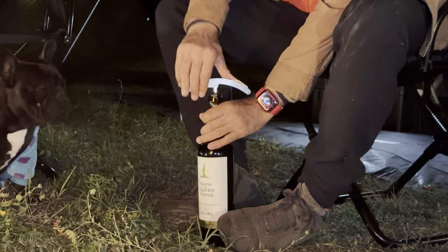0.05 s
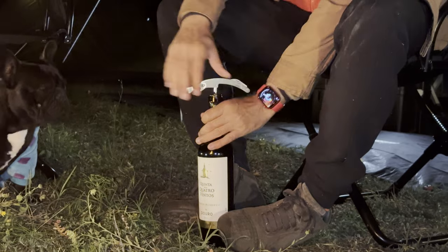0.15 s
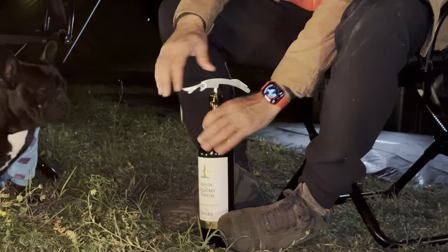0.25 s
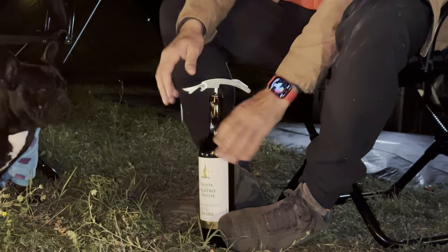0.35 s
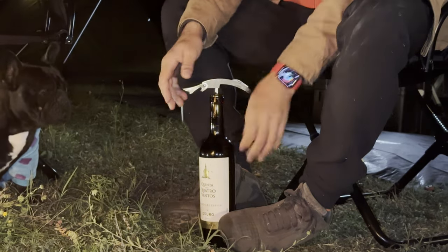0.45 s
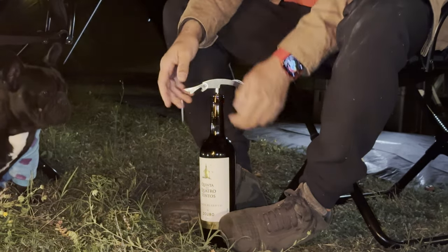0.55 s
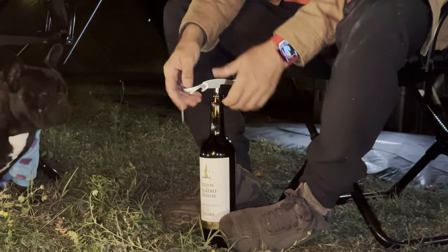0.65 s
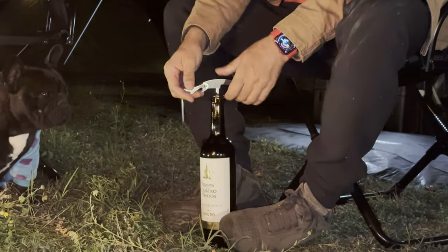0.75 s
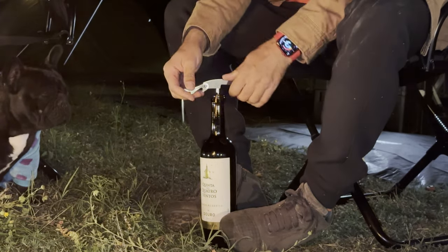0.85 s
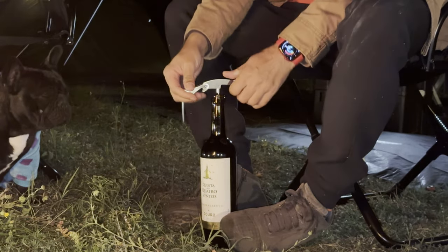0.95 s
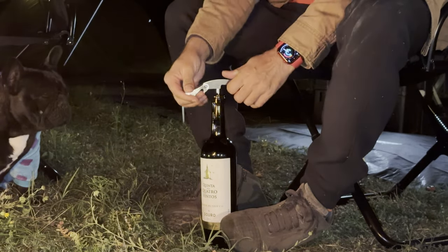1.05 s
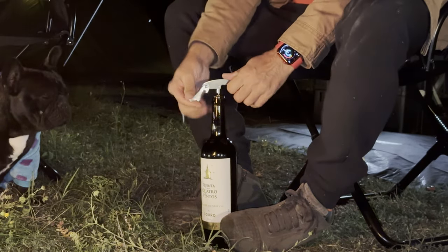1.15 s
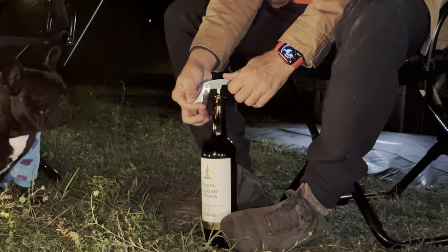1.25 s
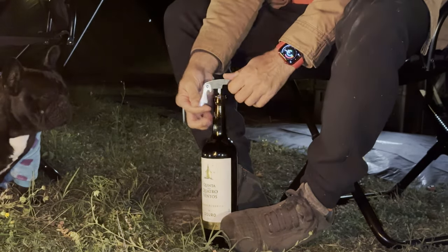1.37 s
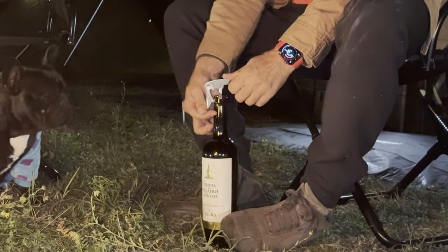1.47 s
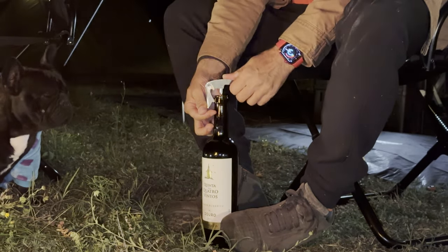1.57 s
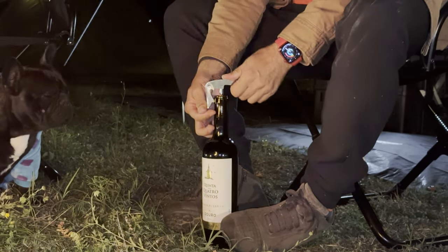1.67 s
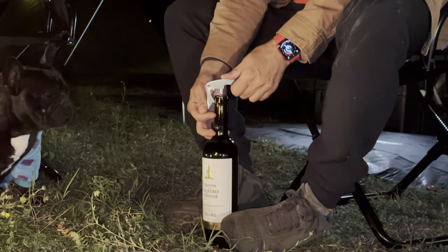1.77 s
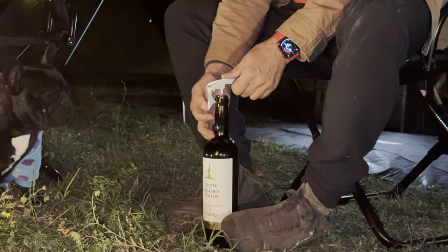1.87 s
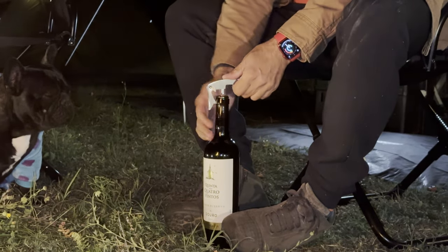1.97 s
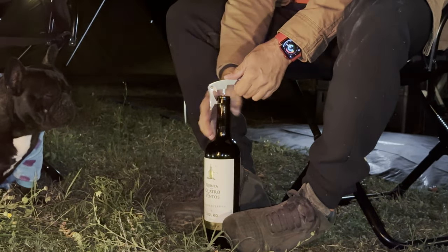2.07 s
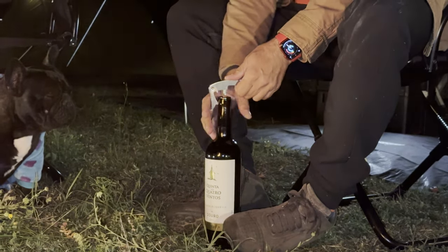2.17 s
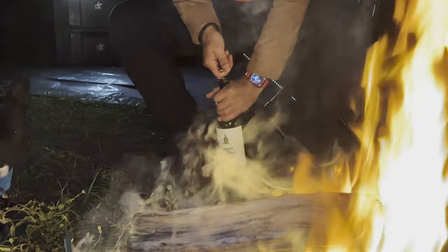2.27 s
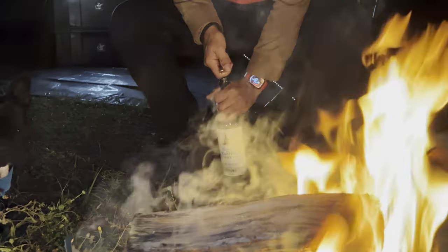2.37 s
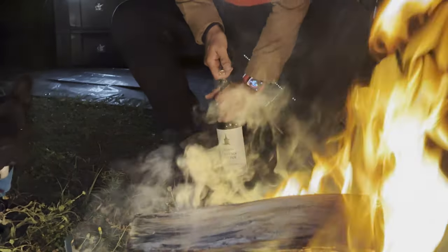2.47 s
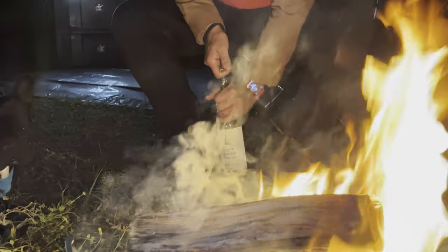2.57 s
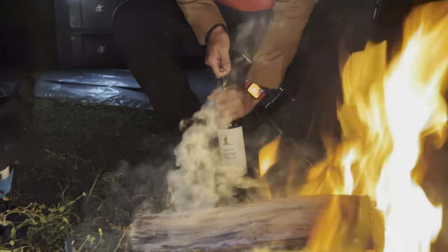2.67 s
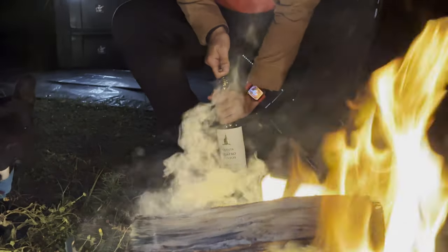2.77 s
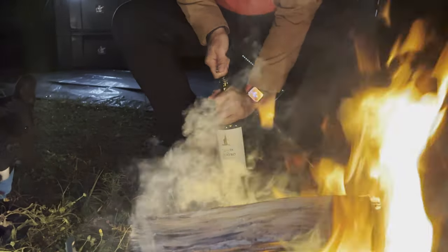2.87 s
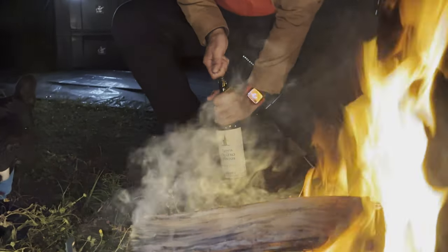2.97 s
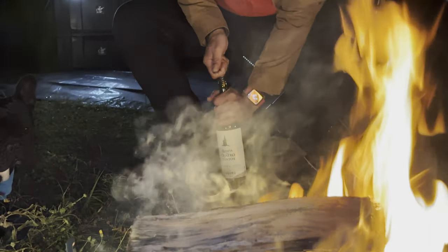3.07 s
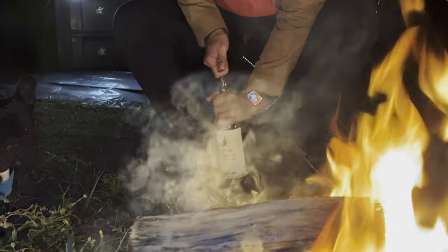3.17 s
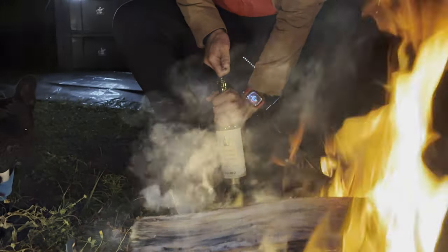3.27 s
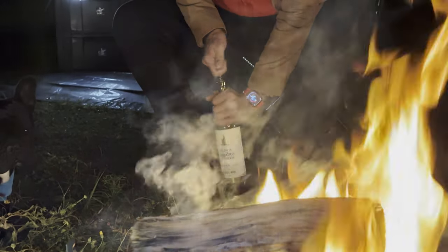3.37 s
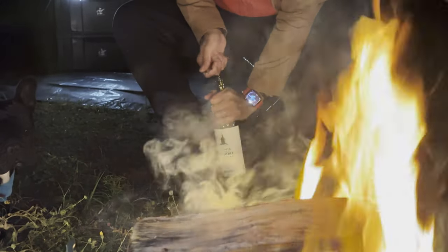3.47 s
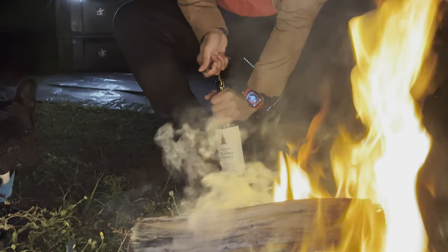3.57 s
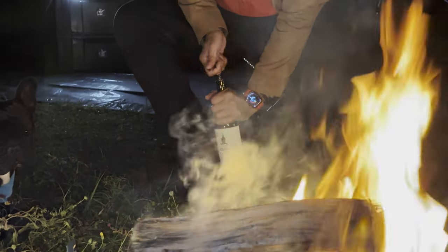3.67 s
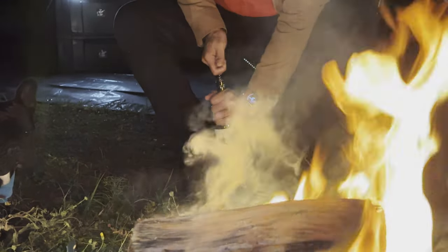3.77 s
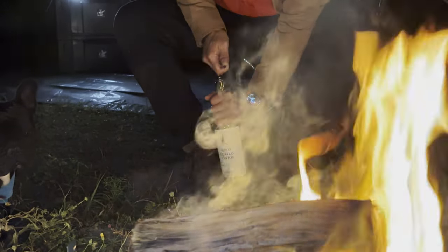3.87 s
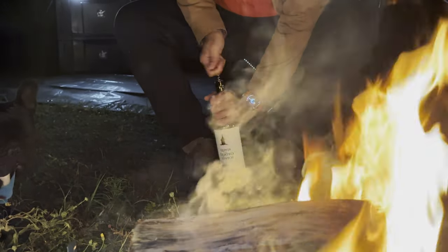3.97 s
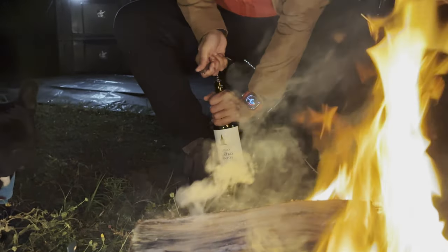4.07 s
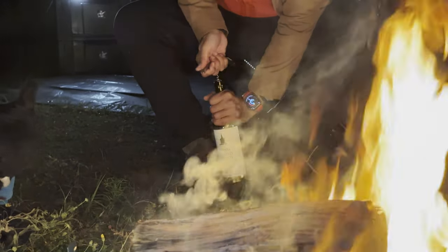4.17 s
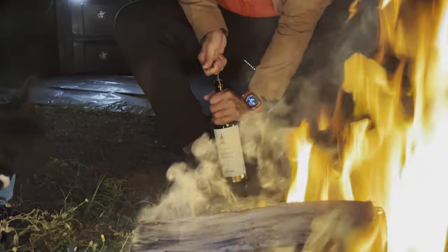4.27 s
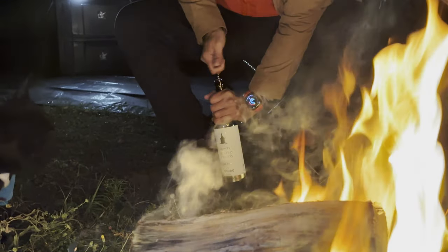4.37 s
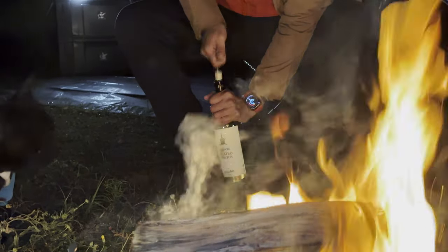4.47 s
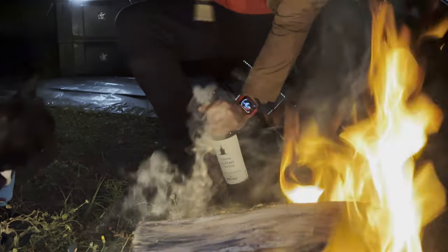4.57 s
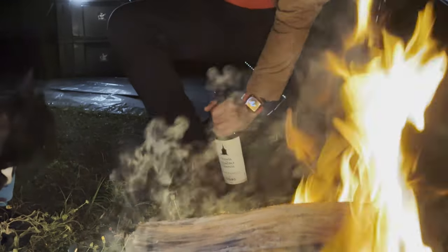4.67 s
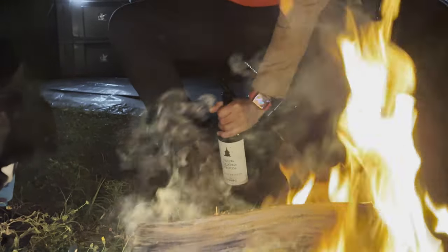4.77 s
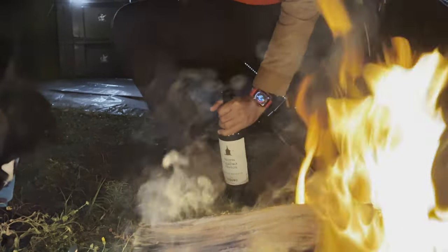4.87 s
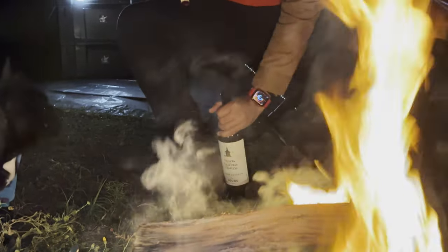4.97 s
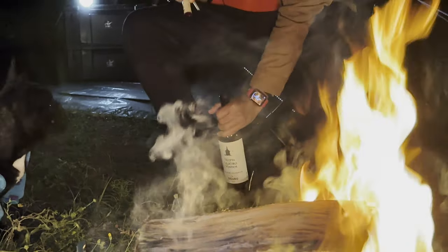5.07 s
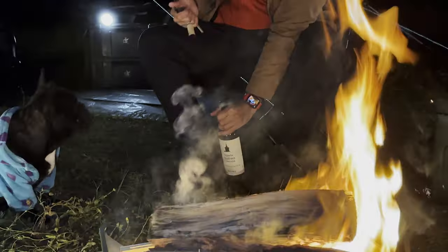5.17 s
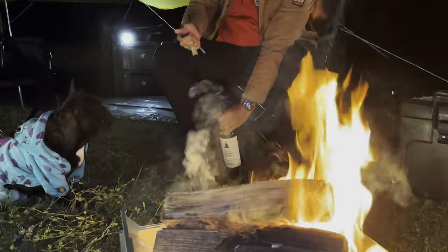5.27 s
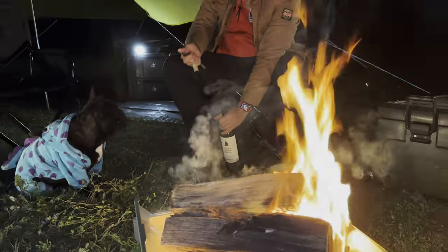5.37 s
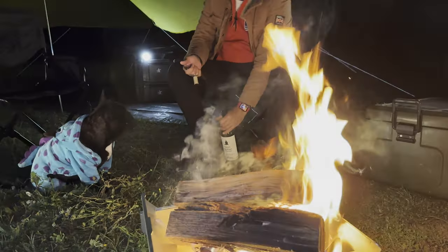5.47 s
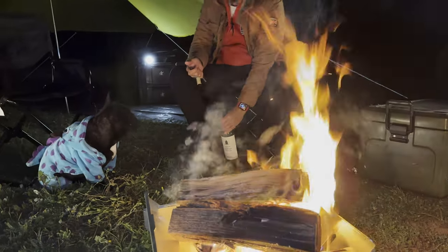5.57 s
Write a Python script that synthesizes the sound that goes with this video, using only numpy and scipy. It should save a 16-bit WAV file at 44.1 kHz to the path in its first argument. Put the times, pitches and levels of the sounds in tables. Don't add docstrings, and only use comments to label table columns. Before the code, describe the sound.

Night air and a campfire make a low, fluttering rumble throughout, with dry wood snaps, mostly leaning slightly left. From 0 to 2.2 s, fingers and a corkscrew lever give dull taps and small knocks on a bottle, denser around 1.1 s, with a bright steel clink at 1.45 s. At about 2.3 s the microphone jumps nearer the fire: deeper rumble, faint spits, ember ticks and gusts of hiss. A strong snap comes at 2.8 s. The screw chafes narrowly in the cork from 2.9 to 4.1 s; at 3.3 s a very loud snap precedes a squeak that climbs, drops and rises again until 3.5 s. Another strong snap hits at 4.38 s among short, rough cork tugs between 4.1 and 4.45 s, with the glass singing. At 4.51 s comes the loud, hollow pop with thump and puff, then a wavering whistle until 4.65 s. Ticks, soft taps and fire continue to about 5.6 s.

```python
import sys
import numpy as np
from scipy import signal
from scipy.fft import irfft
from scipy.io import wavfile
from scipy.ndimage import uniform_filter1d

SR = 44100
rng = np.random.default_rng(int(sys.argv[2]) if len(sys.argv) > 2 else 0)


def gain_from_decibels(decibels):
    exponent = np.asarray(decibels, float) / 20
    return 10 ** exponent


def to_wav(s):
    ch = np.atleast_2d(s).T
    pcm = np.round(np.clip(ch, -1, 1) * 32767)
    wavfile.write(sys.argv[1], SR, pcm.astype(np.int16))


N = 248106
CHANGE_S = 2.26


def evened(x):
    return x / np.sqrt(np.mean(x ** 2) + 1e-20)


def read(points, hz, column=1):
    table = np.transpose(points)
    return np.interp(np.log(hz + 1), np.log(table[0] + 1), table[column])


def add(mix, s, sound, pan_db=0.):
    part = mix[:, round(s * SR):][:, :len(sound)]
    part += gain_from_decibels(np.array([[pan_db / 2], [-pan_db / 2]])) * sound[:part.shape[1]]


def resonate(x, hz, width):
    turn = np.exp(2j * np.pi * np.cumsum(hz * np.ones(len(x))) / SR)
    r = np.exp(-np.pi * width / SR)
    return 2 * (turn * signal.lfilter([1 - r], [1, -r], x / turn + 1e-18)).real


def band(x, lo_hz, hi_hz):
    return signal.sosfilt(signal.butter(2, [lo_hz, hi_hz], "bandpass", fs=SR, output="sos"), x)


def band_twice(x, outer, inner):
    return band(band(x, *outer), *inner)


def ring(modes, t):
    return sum(gain_from_decibels(db - 60 * t / t60) * np.sin(2 * np.pi * hz * t) for hz, db, t60 in modes)


def burst(t60, rise_s, tail_db, tail_t60=0.091):
    t = np.arange(8000) / SR
    fall = gain_from_decibels(-60 * t / t60) + gain_from_decibels(tail_db - 60 * t / tail_t60)
    return rng.standard_normal(len(t)) * (1 - np.exp(-t / rise_s)) * fall


def unroll(rows):
    s, *columns = np.transpose(rows)
    t = np.arange(s[0], s[-1], 1 / SR)
    return s[0], [np.interp(t, s, c) for c in columns]


def swells(rows, t, depth_db):
    s, db, rise_s, fall_s = np.transpose(rows)[:, :, None]
    return (db - depth_db * np.maximum((s - t) / rise_s, (t - s) / fall_s)).max(axis=0)


# frequency in Hz, level in dB per Hz before the background changes, the same
AIR_TONE = [(15, -70, -45), (26.6, -18.5, -13), (51, 7, 6.5), (111, -3, -4), (251, -17, -19),
            (446, -28, -23), (900, -28, -21.5), (2056, -33.5, -32), (3160, -42.5, -45.5), (6000, -39, -56),
            (9000, -40, -60), (15560, -52, -42.5), (16100, -76.5, -69.5)]
# frequency in Hz, left-right likeness 0-1.
AIR_LIKENESS = [(60, 0.99), (130, 1), (290, 0.884), (640, 0.54), (1410, 0.056), (2500, 0.68), (4000, 0.89),
                (7000, 1), (15000, 0.57)]
# frequency in Hz, level in dB.
HISS_TONE = [(1500, -11.5), (3000, 4), (6000, -2), (9000, -0.5), (15700, -3), (16100, -26)]
# time in seconds, low roar in dB.
FLARES = [(0.0, -62.5), (0.17, -58), (0.45, -61), (1.24, -59.5), (1.41, -65), (2.1, -67), (2.8, -62.5),
          (3.2, -65), (3.9, -62.5), (4.14, -58.5), (4.48, -57.5), (5.11, -67), (5.63, -64)]
# frequency in Hz, share of the flare felt 0-1.
FLARE_SHARE = [(60, 0.095), (130, 0.51), (400, 0.886), (900, 0.44), (2500, 1), (5000, 0.62), (9000, 0.12)]
# peak in seconds, peak in dB, rise in seconds, fall in seconds.
GUSTS = [
    (3.19, -75.5, 0.32, 0.216),
    (3.39, -74, .07, 0.12),
    (3.73, -76, 0.17, 0.82),
    (4.37, -67, 0.51, 0.55),
    (4.56, -66.5, 0.5, 0.28),
    (5.63, -79.5, 0.61, .1),
]
AIR_DB, HISS_DB, GUST_DEPTH_DB, PATCHY_DB = -52.5, -84.5, 19, 2.1


def air():
    frames, hz = N // 256 + 5, np.fft.rfftfreq(1024, 1 / SR)
    a, b, c, d, patches = rng.standard_normal((frames, 513, 5)).T
    patches = evened(uniform_filter1d(uniform_filter1d(patches, size=14, axis=0), size=10, axis=1))
    t = np.arange(frames) * 256 / SR
    before, after = (gain_from_decibels(read(AIR_TONE, hz, column=k)) for k in (1, 2))
    level = np.where(t < CHANGE_S, before[:, None], after[:, None])
    level *= gain_from_decibels(AIR_DB) / np.sqrt(np.mean(before ** 2))
    flare_db = np.interp(t, *np.transpose(FLARES))
    level *= gain_from_decibels(np.outer(read(FLARE_SHARE, hz), flare_db - np.median(flare_db)))
    gust = gain_from_decibels(np.maximum(swells(GUSTS, t, GUST_DEPTH_DB), HISS_DB) + 5.5) * (t >= CHANGE_S)
    gust = gain_from_decibels(read(HISS_TONE, hz))[:, None] * gust
    flutter = gain_from_decibels(PATCHY_DB * patches * np.clip(hz / 400, .6, 1)[:, None])
    same = read(AIR_LIKENESS, hz)[:, None]
    left = a + 1j * b
    right = same * left + np.sqrt(1 - same ** 2) * (c + 1j * d)
    z = np.array([left, right]) * np.hypot(level, gust) * flutter
    unit = np.std(signal.istft(left, nperseg=1024, noverlap=768)[1])
    return signal.istft(z, nperseg=1024, noverlap=768)[1][:, :N] / unit


# start in seconds, peak in dB, low part in dB, top part in dB,
# left-right in dB.
SNAPS = [(0.1218, -29.5, 0.5, -31, 4.5), (1.035, -33.5, -26, -33, 0.0), (1.4531, -26, -24, -13, 4.5),
         (1.7577, -32.5, -16.5, -27, 3.5), (2.0472, -32, -20, -16, 4), (2.397, -34.5, -15, -14, 2),
         (2.787, -19.5, -24.5, -17.5, 3.5), (2.8028, -39, -15, -24, -6), (2.768, -53, -18, -19, 0),
         (3.2858, -61, -30, -4, 0), (4.4855, -49, -22, -11.5, 1), (3.3, -11, -25.5, -9.5, 2),
         (3.8015, -44, -5, -24, 8), (4.376, -21, -17, -15, 5), (5.6234, -31.5, -25.5, -22.5, -5)]
# start in
# seconds, peak in dB, top part in dB, centre in Hz.
TICKS = [(2.2837, -56, -16, 9400), (2.579, -51, -19, 8930), (2.9121, -53.5, -24, 8600),
         (2.939, -57, -23, 5870), (3.0237, -57.5, -21, 8900), (3.1307, -54, -16, 8000),
         (3.1946, -57, -16, 8930), (3.5597, -58.5, -23, 8750), (4.1826, -43, -33, 6770),
         (4.1869, -46, -34, 5400), (4.601, -44, -18, 9000), (4.6249, -55, -11.5, 9440),
         (4.6593, -40.5, -15, 8570), (4.6917, -40, -7, 5800), (4.7386, -57, -11, 5480),
         (4.75, -54, -10, 8270), (4.795, -46, -17, 9370), (4.8592, -52, -12, 6780), (4.879, -58, -15, 9400),
         (4.9528, -63, -10, 6080), (5.052, -47, -12, 8240), (5.4958, -51, -10, 8900),
         (5.5082, -53.5, -14.5, 8600), (5.542, -59, -24, 5910)]
SNAP_HZ, TICK_LOW_DB, TICK_GAIN_DB = 8133, -21, 0.1
LOUD_DB = -40
SPITS_PER_S, SPITS_DB = 25, -71


def crackle(db, low_db, top_db, centre_hz):
    loud = db > LOUD_DB
    crack = burst(.0085, rise_s=.0005, tail_db=-21 - .45 * max(db - LOUD_DB, 0), tail_t60=.1)
    crack[25] += np.clip((db + 52.5) / 1.1, 0, 6.5)
    crack = band(crack, 300, 17000 if loud else 15000)
    ranges = [(700, 6070), (3000, 10800), (11500, 17200 if loud else 15700)]
    low, middle, top = (evened(band_twice(crack, hz, hz)) for hz in ranges)
    pitch_db = -8.8 if db >= LOUD_DB else 0.5
    middle = evened(middle + gain_from_decibels(pitch_db) * evened(resonate(middle, centre_hz, 1900)))
    top_fall = gain_from_decibels(-np.arange(len(top)) / SR * 760.0)
    crack = gain_from_decibels(low_db + 10.5) * low + middle + gain_from_decibels(top_db + 12.5) * top * top_fall
    return crack / abs(crack).max()


def fire():
    out = np.zeros((2, N))
    snaps = [(*row, SNAP_HZ) for row in SNAPS]
    ticks = [(s, db + TICK_GAIN_DB, TICK_LOW_DB, top_db, 0, hz) for s, db, top_db, hz in TICKS]
    for s, db, low_db, top_db, pan_db, centre_hz in snaps + ticks:
        add(out, s, gain_from_decibels(db + 1.0) * crackle(db, low_db, top_db, centre_hz), 0.83 * pan_db)
    sizes = gain_from_decibels(2.1 * np.minimum(rng.exponential(1, N), 3))
    sizes *= (rng.random(N) < SPITS_PER_S / SR) * (np.arange(N) > CHANGE_S * SR)
    spit = band(burst(0.0059, rise_s=.0003, tail_db=-35.5), 3500, 16000)
    return out + gain_from_decibels(SPITS_DB) * signal.oaconvolve(sizes, spit)[:N]


# start in seconds,
# peak in dB, centre in Hz, broad click in dB.
TAPS = [(0.122, -28.5, 1300, -9), (0.14, -36, 1430, -2), (1.032, -45.5, 824, 13), (1.071, -33.5, 1330, -5),
        (1.084, -35, 477, -2), (1.101, -39, 2130, 10), (1.113, -38, 1300, -1), (1.205, -43.5, 687, -10),
        (1.319, -54.5, 802, 14), (1.419, -46.5, 1330, 4), (1.482, -47, 700, 16), (1.537, -50.5, 616, 9),
        (1.638, -50, 980, -8), (1.724, -47.5, 830, 8), (1.755, -48.5, 1510, -0.5), (1.764, -57, 826, 3),
        (1.936, -53.5, 711, -19), (2.046, -56, 1550, -4), (2.305, -48.5, 619, 7), (2.5, -50.5, 714, -11),
        (2.646, -63, 526, 7), (3.342, -45.5, 795, -5), (4.295, -39.5, 1410, 7), (4.684, -51.5, 805, -1),
        (4.859, -46, 2100, 5.5), (4.977, -51, 617, -26), (5.1, -52, 422, -23), (5.511, -61, 1900, -15),
        (5.6235, -35.5, 830, -9.5)]
# start
# in seconds, peak in dB, centre in Hz, broad click in dB, t60 in seconds.
THUDS = [(.185, -55, 660, -9, 0.26), (1.079, -48, 900, 2.5, 0.026), (1.092, -53, 1210, -7, .02),
         (1.129, -48.5, 1300, 5, .02), (1.165, -53, 1300, -5.5, .02), (1.207, -46.5, 340, -11, 0.049),
         (3.3007, -36.5, 2520, -24, 0.012), (3.301, -35.5, 1430, -20, 0.017),
         (0.1226, -42, 2400, -3, 0.028), (3.517, -54, 400, -19, 0.039), (3.525, -56.5, 2300, -8, 0.013),
         (4.105, -56, 2150, -8, .03), (4.684, -52.5, 3200, -16, .02)]
# start in seconds, peak in dB, level of the upper modes in dB.
CLINKS = [
    (0.059, -54.5, -17),
    (1.4540, -31, 3),
    (1.755, -59, -12),
]
# frequency in Hz, level in dB, t60 in seconds.
LEVER = [(2207, -10, .025), (4167, -11, .21), (4313, 0, .062), (5276, -21, .18), (5405, -18, .11),
         (5750, -7, .016), (7160, -24, .06), (7887, -27, .1), (8877, -28, .15), (9022, -14, .04),
         (9938, -24, .07), (12650, -22, .018), (14410, -17, .06), (14790, -20, .06)]
TAP_T60_S, HANDS_PAN_DB = .018, -1.5


def hands():
    out, t = np.zeros((2, N)), np.arange(SR // 4) / SR
    for s, db, hz, bright_db, t60 in [(*row, TAP_T60_S) for row in TAPS] + [tuple(row) for row in THUDS]:
        blow = burst(.008, rise_s=.0008, tail_db=-19, tail_t60=.06)
        blow[40] += 5.0
        width = 5.0 / t60
        knock = evened(resonate(blow, hz, width) - gain_from_decibels(-16.5) * resonate(blow, 1.73 * hz, width + 300))
        knock += gain_from_decibels(bright_db) * evened(band_twice(blow, (260, 3500), (300, 3200)))
        knock = band(knock, 98, 2900)
        add(out, s + 0.00049, gain_from_decibels(db) * knock / abs(knock).max(), HANDS_PAN_DB)
    for s, db, upper_db in CLINKS:
        clink = ring(LEVER[:3:2], t) - ring(LEVER[1:2], t) * (1 - np.exp(-t / .009))
        clink += gain_from_decibels(upper_db) * (ring(LEVER[4:], t) - ring(LEVER[3:4], t))
        clink *= 1 - np.exp(-t / 0.0018)
        add(out, s - .001, gain_from_decibels(db) * clink / abs(clink).max())
    return out


# peak in seconds, peak in dB, rise in seconds, fall in seconds.
CHAFE = [(2.92, -76.5, 0.12, .1), (2.97, -75, .05, 0.088), (3.04, -77, 0.043, .02),
         (3.25, -56, 0.072, 0.0357), (3.42, -71, 0.07, 0.16), (3.46, -64, .1, 0.098),
         (3.576, -71, 0.077, 0.025), (3.70, -73, 0.026, 0.09), (3.745, -59.5, 0.02, 0.16),
         (3.83, -61.5, 0.2, 0.068), (4.004, -68, 0.054, 0.094), (4.09, -71, 0.11, 0.074)]
CHAFE_DEPTH_DB, SCREW_HZ, SCREW_WANDER_HZ = 23, 4387, 20


def chafe():
    db = swells(CHAFE, np.arange(N) / SR, CHAFE_DEPTH_DB)
    noise = rng.standard_normal((3, N))
    wander = evened(uniform_filter1d(uniform_filter1d(noise[0], size=900), size=900))
    hz = SCREW_HZ + SCREW_WANDER_HZ * wander
    throb = gain_from_decibels(4.5 * evened(uniform_filter1d(noise[1], size=300)))
    rasp = throb * noise[2]
    squeal = evened(resonate(resonate(rasp, hz, 140), hz, 300))
    squeal += gain_from_decibels(-12) * evened(resonate(rasp, hz / 2, 150))
    return gain_from_decibels(db - 0.5) * (squeal + gain_from_decibels(-7.0) * evened(band(rasp, 3500, 10200)))


# frequency in Hz, width in Hz, level in dB.
NECK = [(550, 240, -5.5), (1330, 110, -1), (2030, 660, -7.5)]
# frequency in Hz, level in dB.
GLASS = [(3573, -3), (5405, -6), (5800, -10), (1814, 3)]
# frequency in Hz, width in Hz, level in dB.
WALL = [(4410, 170, -5), (5360, 380, -7), (6850, 400, 5), (8200, 330, -4), (9340, 350, 6)]
RISEN_S, GLASS_LAG_S = 4, .016


def slip(s, db, hz, rough, hiss_db, glass_db, lowest_db):
    rough, noise = np.clip(rough, 0, 1), rng.standard_normal((2, len(db)))
    turns = np.cumsum(hz * (1 + 1.2 * rough * uniform_filter1d(noise[0], size=60))) / SR

    def harmonic(k):
        return np.cos(2 * np.pi * k * turns)

    pulses = gain_from_decibels(lowest_db) * harmonic(1) + sum(harmonic(k) * gain_from_decibels(-4.0 * max(k - 3, 0)) for k in range(2, 6))
    rub = (0.27 + np.exp(-(turns % 1) / 0.44)) * noise[1]
    bite = gain_from_decibels(4.5 * noise[1][(np.floor(turns) % len(db)).astype(int)])
    drive = (1 - rough) * evened(pulses) + rough * evened(bite * rub)
    neck = sum((-1) ** k * gain_from_decibels(g) * resonate(drive, f, w) for k, (f, w, g) in enumerate(NECK))

    ring_on = SR // 4
    waver = gain_from_decibels(4.5 * evened(uniform_filter1d(rng.standard_normal(len(db) + ring_on), size=600)))
    keep = np.exp(-1 / (GLASS_LAG_S * SR))
    pull = np.pad(gain_from_decibels(db + glass_db), (0, ring_on))
    built = signal.lfilter([(1 - keep) ** 2], [1, -2 * keep, keep ** 2], pull)
    t = s + np.arange(len(built)) / SR
    modes = GLASS[:4 if s > RISEN_S else 1]
    glass = built * waver * sum(gain_from_decibels(g) * np.sin(2 * np.pi * f * t) for f, g in modes)

    clicks = sum(harmonic(k) for k in range(4, 19))
    grit = bite * ((1 - rough) * evened(clicks) + rough * evened(rub))
    grit = band_twice(grit, (1900, 11000), (1500, 9600))
    wall = sum(gain_from_decibels(g) * resonate(grit, f, w) for f, w, g in WALL)
    fizz = band_twice(rub, (12500, 16000), (12500, 16000))
    hiss = evened(grit) + gain_from_decibels(-4.0) * evened(wall) + gain_from_decibels(-21.0) * evened(fizz)
    sound = evened(neck) + gain_from_decibels(hiss_db) * evened(hiss)
    return s, glass + np.pad(gain_from_decibels(db) * sound * signal.windows.tukey(len(db), .05), (0, ring_on))


def tug(s, length, peak_db, hz, rough):
    u = np.arange(0, length, 1 / SR) / length
    db = peak_db + np.interp(u, [0, 0.0815, 0.495, 1], [-10.5, 0, -1, -25])
    return s, db, hz * (1 - .1 * (1 - np.sin(np.pi * u ** .7))), rough + 0.32 * u


# time in seconds, level in dB, slip rate in Hz.
SQUEAK = [
    (3.34, -62, 767),
    (3.365, -59.5, 1008),
    (3.383, -54.5, 860),
    (3.4, -59, 636),
    (3.425, -57, 491.5),
    (3.45, -56, 702),
    (3.475, -64, 725),
    (3.51, -75, 695),
]
# start and length in seconds, peak in dB, slip rate in Hz, roughness 0-1.
CHIRPS = [
    (3.355, .055, -57, 660, 0.33),
]
# start and length in seconds, peak in dB, slip rate in Hz, roughness 0-1.
TUGS = [
    (4.073, 0.15, -64.5, 595, 0.9),
    (4.183, 0.065, -53.5, 473, 0.69),
    (4.256, 0.059, -50, 489.4, 0.64),
    (4.327, 0.072, -47.5, 620.5, 0.5),
    (4.406, 0.049, -50.5, 478.8, 0.82),
]


def cork():
    out = np.zeros((2, N))
    s, (db, hz) = unroll(SQUEAK)
    add(out, *slip(s, db, hz, rough=0.49, hiss_db=-4, glass_db=-10, lowest_db=7.5))
    for row in CHIRPS:
        add(out, *slip(*tug(*row), hiss_db=-10, glass_db=-35, lowest_db=-11))
    for row in TUGS:
        add(out, *slip(*tug(*row), hiss_db=-4, glass_db=-12, lowest_db=0))
    return out


# frequency in Hz, level in dB, t60 in seconds.
POP_MODES = [(1085, -2.5, 0.086), (2150, -25, 0.05), (3360, -41, 0.08), (1813, -48.5, 0.19),
             (3590, -54.5, 0.31), (5570, -28, 0.02), (7700, -31, .015)]
# frequency in Hz, level in dB, t60 in seconds.
CORK_MODES = [(860, -8.5, 0.025), (530, -4, 0.02)]
# time in seconds, frequency in Hz, level in dB.
WHISTLE = [
    (4.518, 910, -38),
    (4.54, 945, -37),
    (4.575, 872, -48),
    (4.597, 940, -49),
    (4.618, 1020, -44),
    (4.645, 1005, -58),
    (4.665, 1000, -72),
]
POP_S, POP_DB = 4.5075, -1


def pop():
    out, t = np.zeros((2, N)), np.arange(SR // 3) / SR
    onset = 1 - np.exp(-(t / .0012) ** 3)
    add(out, POP_S, gain_from_decibels(POP_DB) * onset * (ring(POP_MODES, t) - ring(CORK_MODES, t)), pan_db=1.3)
    thump_hz = 90 + 435 * np.exp(-t / .0055)
    swell = (1 - np.exp(-(t / .0027) ** 2)) * gain_from_decibels(-60 * t / .04)
    add(out, POP_S - .0002, gain_from_decibels(-4) * swell * np.sin(2 * np.pi * np.cumsum(thump_hz) / SR))
    out[0] += .65 * band(np.roll(out[0], 2) - out[0], 40, 3000)

    crack = burst(.009, rise_s=0.00021, tail_db=-16.5, tail_t60=0.11)
    add(out, POP_S + 0.00034, gain_from_decibels(-14.0) * band_twice(crack, (7000, 10800), (7000, 10800)))
    top = burst(.006, rise_s=0.0004, tail_db=-27, tail_t60=.07)
    add(out, POP_S + 0.0004, gain_from_decibels(-2.5) * band_twice(top, (12300, 16000), (12300, 16000)))
    middle = burst(.011, rise_s=.0005, tail_db=-23.5, tail_t60=.05)
    add(out, POP_S + .0006, gain_from_decibels(-21) * band(middle, 3300, 6500))

    puff = gain_from_decibels(-35.5 - 60 * t / 0.19) * np.clip((.062 - t) / 0.017, 0, 1)
    for pan_db in (-8, 8):
        add(out, POP_S + 0.0032, puff * band(rng.standard_normal(len(t)), 180, 3500), pan_db)
    s, (hz, db) = unroll(WHISTLE)
    whistle = np.sqrt(2) * gain_from_decibels(db) * np.sin(2 * np.pi * np.cumsum(hz) / SR)
    add(out, s, whistle * signal.windows.tukey(len(hz), .1), pan_db=1.5)
    return out


def scene():
    return air() + fire() + hands() + chafe() + cork() + pop()


def band_limit(x):
    return signal.sosfilt(signal.butter(12, 17140, fs=SR, output="sos"), x)


# frequency in Hz, level in dB.
MIC = [(6900, 0), (7450, 2), (8200, 0), (9900, 1), (11300, -7), (13500, -4.5), (15700, -0.5), (16700, -8),
       (16950, -18.5), (17120, -85.5)]
# frequency in Hz, lead of the left port in radians.
PORTS = [(1500, 0), (2100, .2), (6500, .35), (7100, 1.5), (7450, 3.14), (8000, 5.5), (8350, 6.1),
         (9150, 5.5), (10000, 4.2), (10500, 3.35), (11600, 2.95), (12400, 2.2), (13300, .6), (15400, -.6)]


def record(dry):
    hz = np.fft.rfftfreq(512, 1 / SR)
    ports = gain_from_decibels(read(MIC, hz)) * np.exp(.5j * np.outer([1, -1], read(PORTS, hz)))
    colour = np.fft.fftshift(irfft(ports), axes=1) * signal.windows.hann(512, sym=False)
    cut = signal.sosfilt(signal.butter(4, 44, "highpass", fs=SR, output="sos"), dry)
    mix = signal.oaconvolve(cut, colour, axes=1)[:, 256:N + 256]
    return band_limit(mix)


dry = scene()
out = record(dry)
to_wav(out)
```